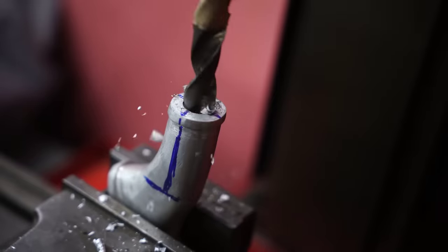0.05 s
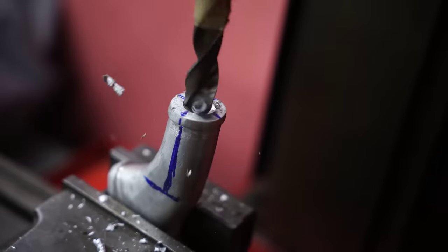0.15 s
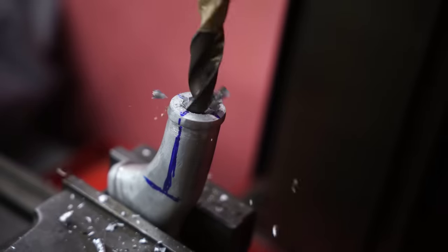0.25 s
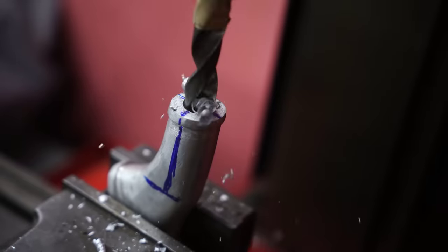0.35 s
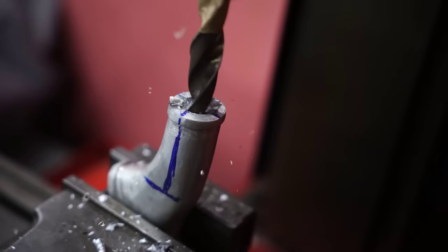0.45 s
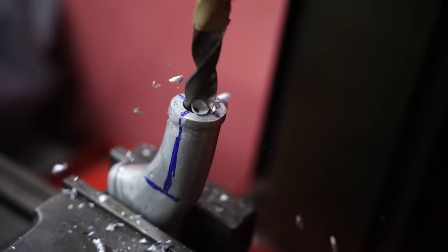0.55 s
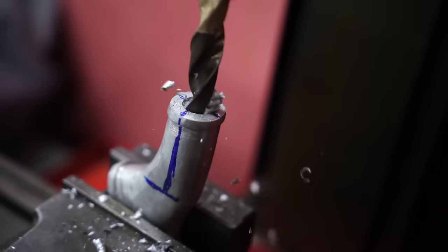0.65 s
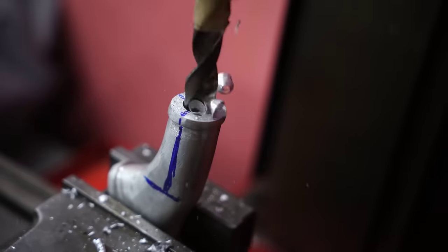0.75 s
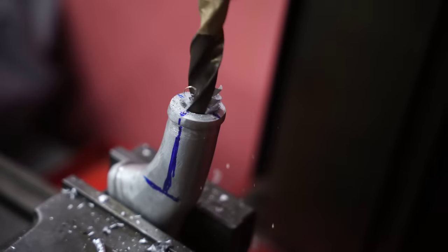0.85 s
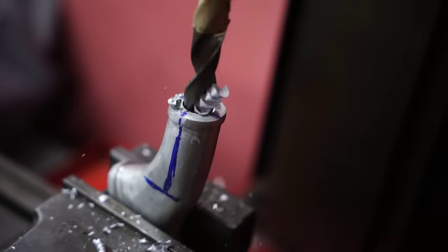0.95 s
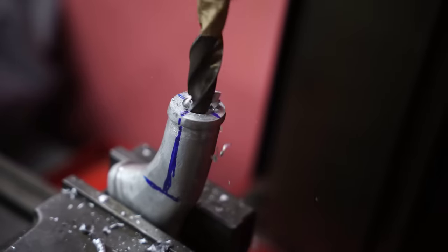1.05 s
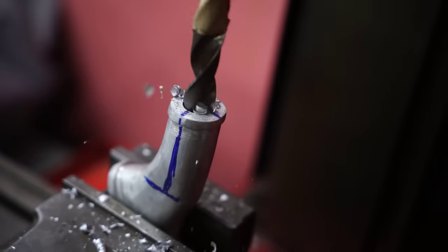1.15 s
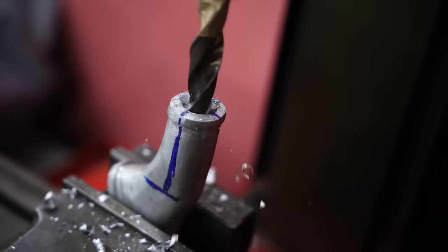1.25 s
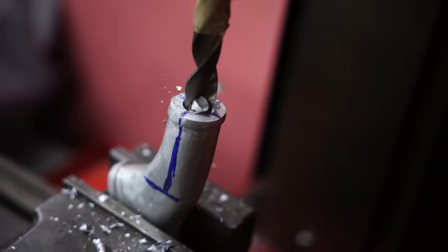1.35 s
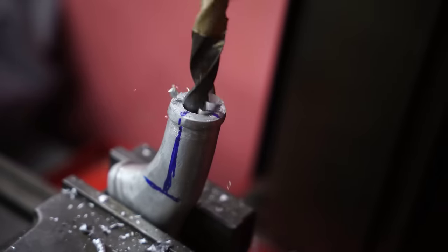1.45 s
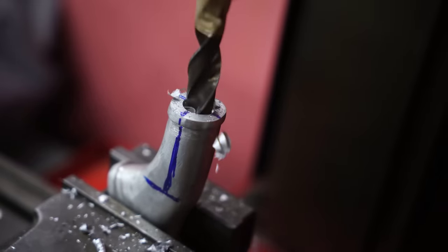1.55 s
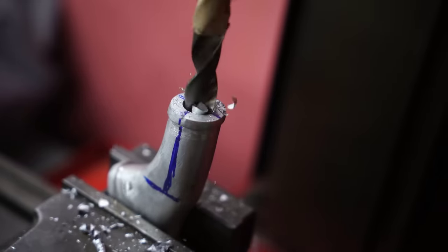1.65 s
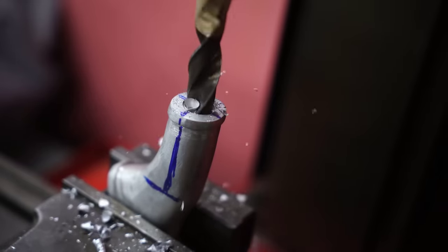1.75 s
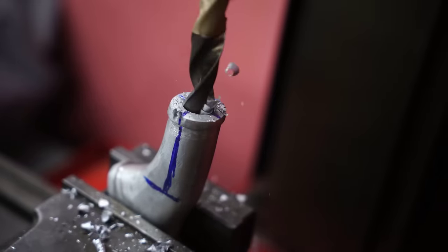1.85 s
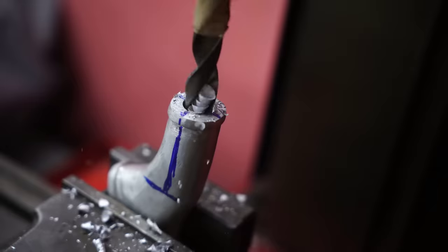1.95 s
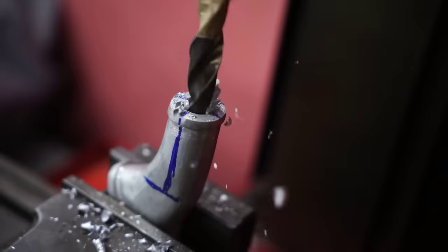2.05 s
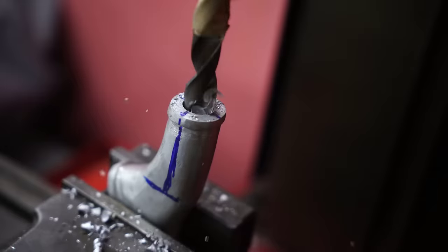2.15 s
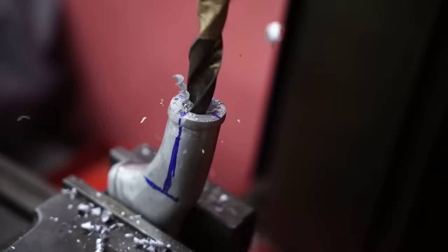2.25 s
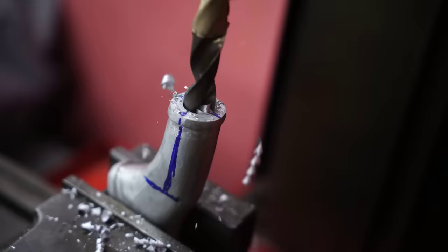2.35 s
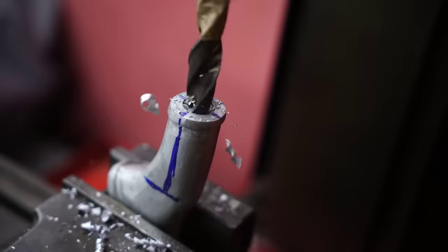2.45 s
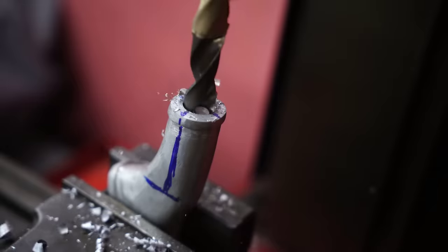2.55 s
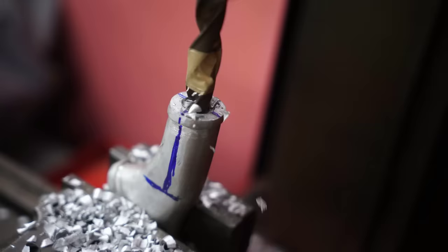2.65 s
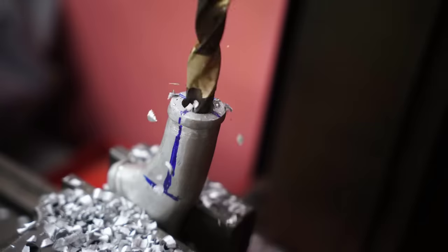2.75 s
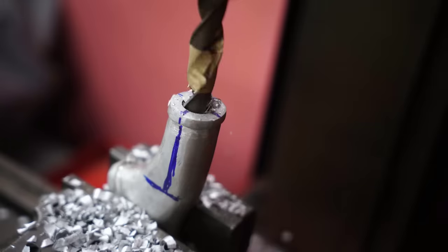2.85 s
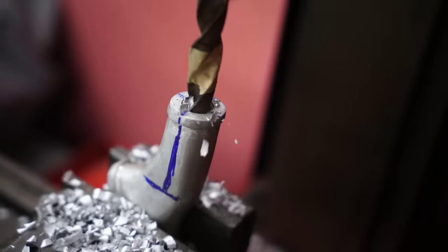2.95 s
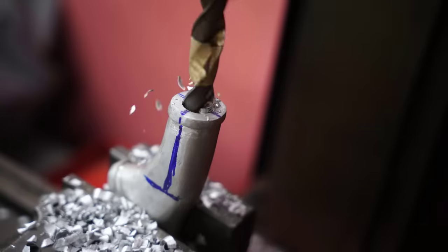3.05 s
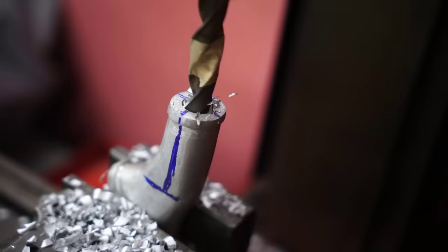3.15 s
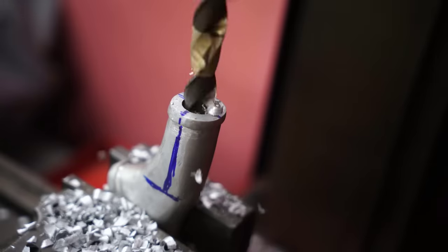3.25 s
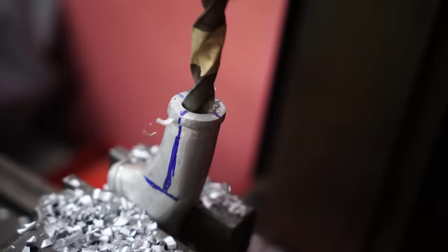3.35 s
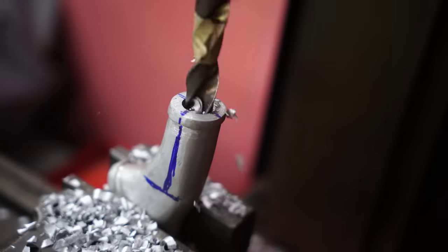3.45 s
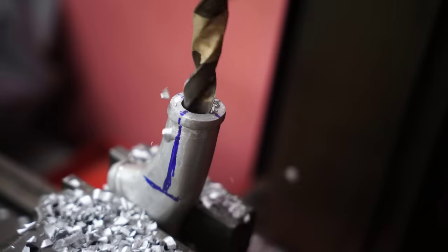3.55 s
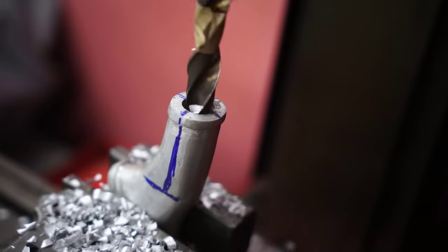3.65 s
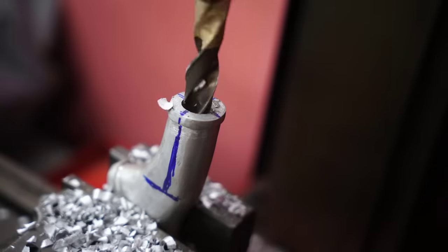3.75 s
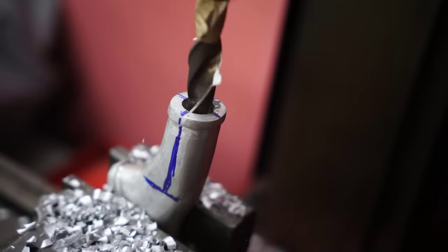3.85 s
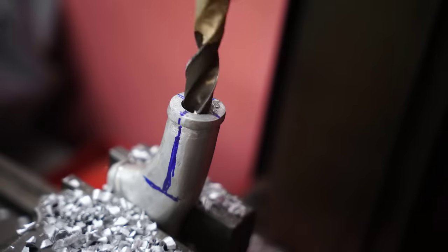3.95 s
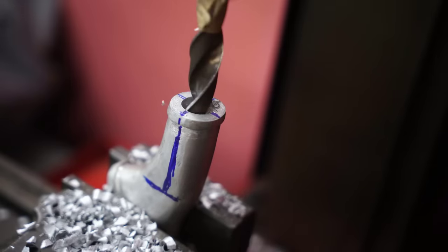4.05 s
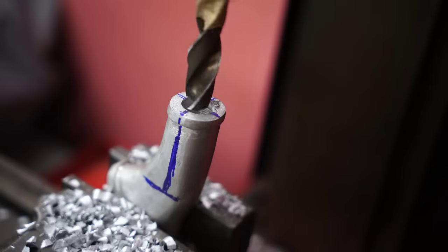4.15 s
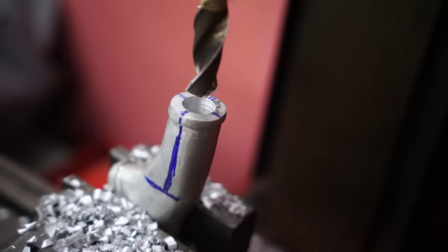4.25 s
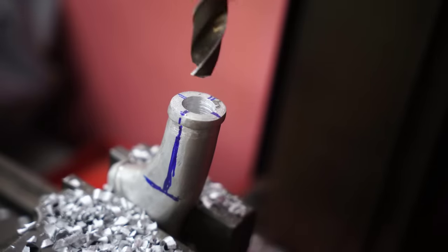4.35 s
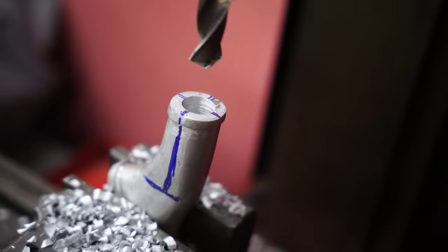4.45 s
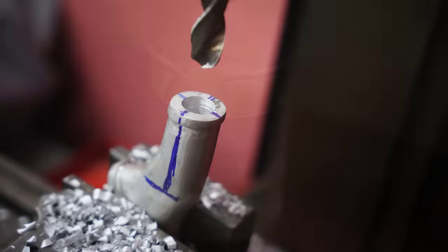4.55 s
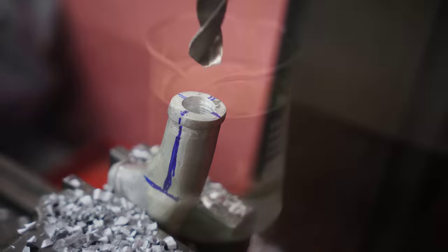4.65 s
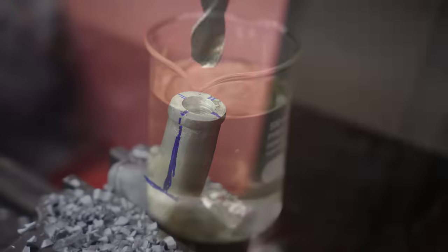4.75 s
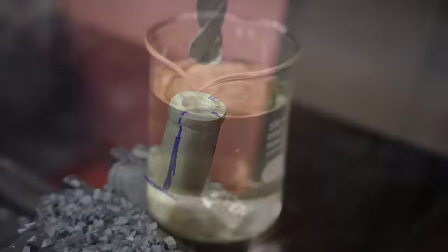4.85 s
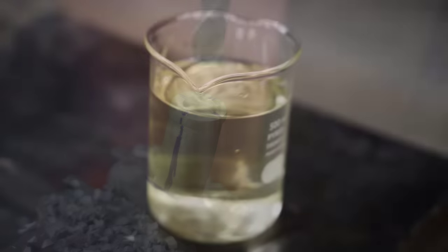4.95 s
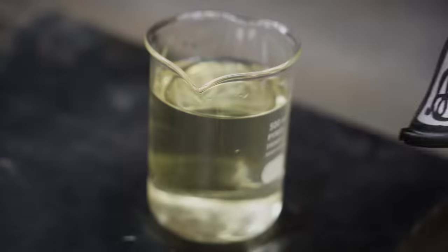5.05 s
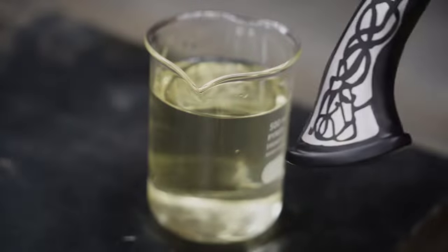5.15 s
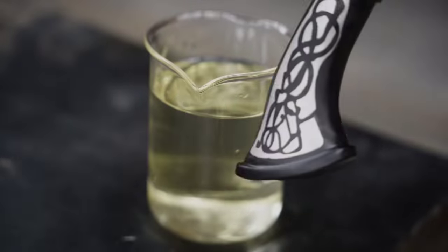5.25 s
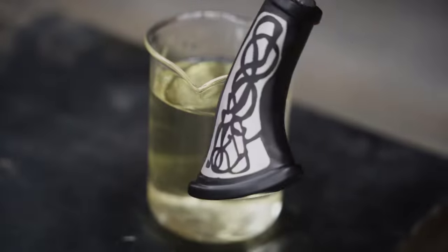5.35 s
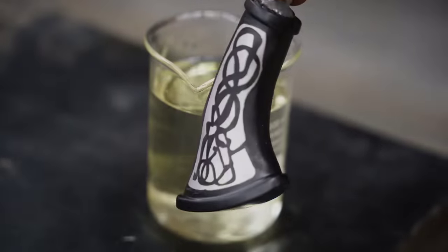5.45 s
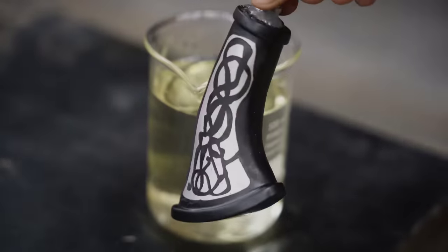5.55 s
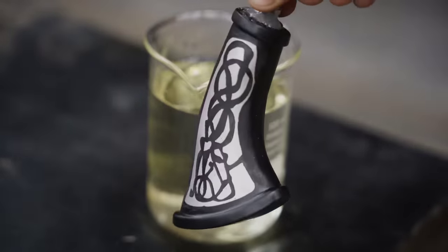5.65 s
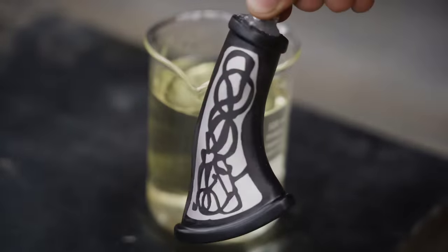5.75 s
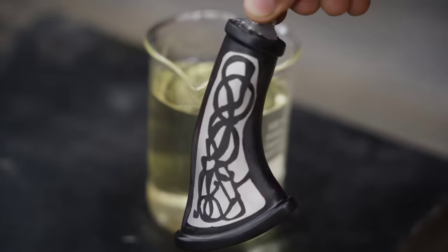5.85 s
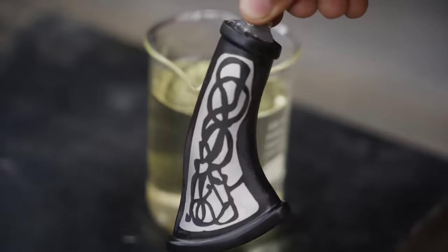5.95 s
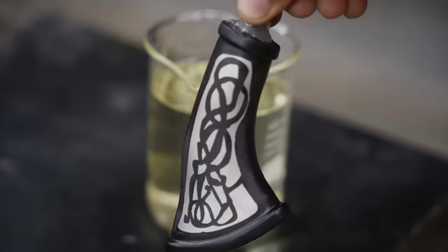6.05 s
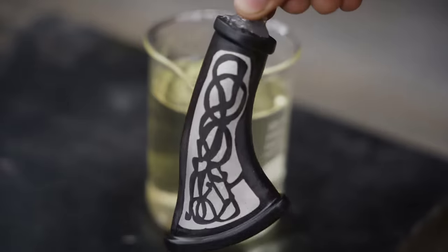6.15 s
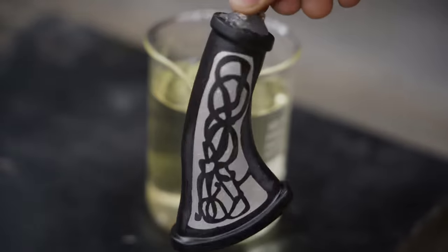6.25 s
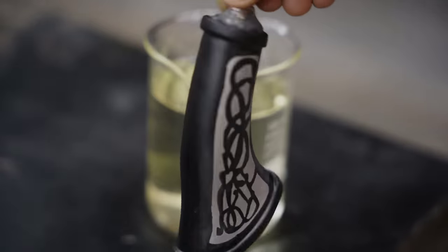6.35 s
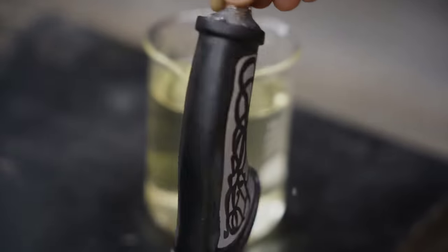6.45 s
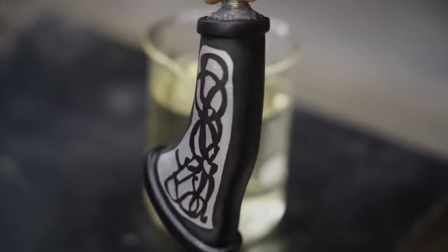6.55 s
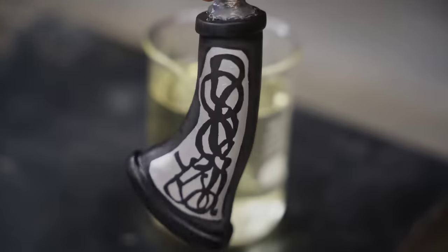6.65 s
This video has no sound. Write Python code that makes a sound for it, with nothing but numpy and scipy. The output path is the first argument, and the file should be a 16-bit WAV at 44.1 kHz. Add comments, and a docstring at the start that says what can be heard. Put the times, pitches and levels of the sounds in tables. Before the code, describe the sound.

Close up, a twist drill bores into a clamped metal casting with loud, rough, bright tearing and snapping chips. At about 2.7 seconds it becomes quieter, uneven rubbing with short squeals, groans and ticks, ending in a few knocks as the drill lifts clear. The drilling stops and a soft workshop fan hum fades in; a metal part clinks onto a bench, cuts off, and the hum swells again.

```python
"""A twist drill bores into a metal casting held in a vice: rough tearing noise rings drill and casting and
throbs with each turn, and thick chips snap. Then the drill binds and squeals, chips tick, and the drill knocks
the hole and lifts clear. From 4.575 s a quiet workshop is heard instead: a fan, made of air noise through
resonances plus steady tones, fades in, and a metal part is set on the bench, its ringing modes made of close
pairs of tones that beat. At 5.742 s the part is silent and the hum drops abruptly, then swells again."""
import sys
import numpy as np
from scipy import signal
from scipy.io import wavfile

SR = 44100
rng = np.random.default_rng(int(sys.argv[2]) if len(sys.argv) > 2 else 0)


def store_wav(level_fs):
    """Save 16-bit WAV to argv[1]."""
    pcm = np.round(np.clip(np.atleast_2d(level_fs), -1, 1) * 32767)
    wavfile.write(sys.argv[1], SR, pcm.T.astype(np.int16))


N = 295773

# Two stretches of fan hum; its swings move the regions and tones of the fan: time_s, level_db
HUM = [
    [(4.575, -69.5), (4.78, -57), (4.84, -44), (4.89, -44.5), (4.925, -42.5), (4.945, -53), (4.98, -40),
     (5.04, -41.5), (5.1, -44.5), (5.39, -40), (5.689, -41), (5.742, -46)],
    [(5.742, -69), (5.84, -52.5), (5.92, -40), (6.068, -38.5), (6.2, -37), (6.25, -34), (6.31, -43.5),
     (6.4, -36.5), (6.51, -41.5), (6.65, -35.5), (6.707, -42)],
]
# Borders between rumble, hum, rush, whir and hiss of the fan: pitch_hz
HUM_EDGES_HZ = [25, 210, 720, 1400, 3100, 13500]
# Resonances of fan and duct, balanced within each region: pitch_hz, width_hz, level_db
FAN = [(70, 115, -19), (132, 21, -16.5), (280, 30, -12.5), (346, 70, -9), (381.3, 4.6, -4.5),
       (461, 35, -10.5), (642.5, 9.4, -12.5), (567, 39, -19.5), (860, 230, -29), (1170, 450, -27.5),
       (1565, 5.4, -18), (1780, 180, -27.5), (2480, 450, -28.5), (3580, 320, -41), (4380, 1500, -41.5),
       (6650, 540, -37.5), (8900, 1300, -51.5), (12400, 1900, -43.5)]
# Rumble, hum, rush, whir and hiss of the fan: mean_level_db, share_of_hum_swing
FAN_REGIONS = [(-54, 0.31), (-45, 0.9), (-59.5, 0.21), (-55, 0.13), (-62, 0.085)]
# Steady tones of the fan motor, at the mean hum level: pitch_hz, level_db
FAN_TONES = [(378, -45), (647.5, -56.5), (1497, -68)]
# The fan's reedy whir coming and going: time_s, level_db
WHIR = [(4.6, -65), (4.85, -73), (5.1, -58.5), (5.25, -54), (5.39, -59), (5.46, -78), (5.63, -54),
        (5.7, -64), (5.8, -83), (5.92, -50.5), (6.07, -70), (6.24, -51.5), (6.31, -56), (6.42, -51.5),
        (6.53, -46.5), (6.65, -60), (6.707, -56)]
WHIR_HZ, WHIR_WIDTH_HZ, WHIR_LEFT_DB = 1803, 120, 11
# Thin electrical whine: time_s, level_db
WHINE = [(2.7, -46), (2.79, -39), (3.43, -68), (3.5, -57), (4.41, -56), (5.05, -75.5), (5.08, -98)]
WHINE_HZ, WHINE_DROP_DB = 15654, 10.5
# Stereo width of the fan, the soft singing noises and the part's treble crack: pitch_hz, side_minus_mid_db
SIDE_FAN = [(60, -46), (110, -45), (200, -40), (380, -21), (700, 6), (1290, -4.5), (2380, -1), (4400, 0.5),
            (8120, 1.5), (15000, -1)]

# Ringing modes of the metal part: pitch_hz, level_db, ring_t60_s
PART = [(3345, -18, 0.95), (3635, -3.5, 0.16), (4315, -23.5, 0.88), (6000, -31, 0.24), (6170, -21, 0.32),
        (6700, -39, .25), (7550, -41, 0.12), (8300, -24, 0.15), (9800, -22, 0.1), (10550, -27, .1),
        (11100, -23, 0.1)]
# The part is set down and rocks: start_s, level_db, share_of_ring_time, rise_ms, held_s, treble_db_per_octave
TOUCHES = [(5.43, -23, 0.17, 3.4, .012, 1), (5.449, -32, .2, 2, .004, 0),
           (5.459, -26.5, 0.14, 2, 0.0034, -7), (5.468, -28, 0.3, 5, 0.037, -17),
           (5.524, -41, 0.34, 4, 0.0079, -20), (5.551, -39, 0.48, 3, 0.0068, -20)]
TREBLE_FROM_HZ = 4400   # the treble slope of a touch starts here
PAIR_APART = 0.005   # share of the pitch
PARTNER, PARTNER_T60_S = 0.36, 2.0   # second tone of each pair: strength and own fading
ROOM_DB, ROOM_BASE_S = -21.5, 0.98   # the workshop holds each ring; shorter for higher modes, then to power 1.7
CRACK_DB, CRACK_T60_S = -33, 0.11   # treble crack of the first touch
SNAP_HZ, SNAP_WIDTH_HZ, SNAP_DB, SNAP_T60_S = 3970, 590, -35, 0.07   # duller part of the crack
# Stereo width of the clinks: pitch_hz, side_minus_mid_db
SIDE_CLINK = [(60, -16), (240, -22), (950, -4), (3770, -0.5), (15000, -3)]
# Short soft singing noises of the sliding part, and a low fan whir at 1690 Hz:
# start_s, level_db, pitch_hz, length_s
SLIDE = [(4.674, -52, 3610, 0.083), (4.772, -59.5, 6080, 0.042), (4.83, -62, 3550, 0.12),
         (4.6, -59.5, 1690, 0.22), (4.61, -64, 4010, .03), (4.755, -65, 4600, 0.046),
         (5.43, -51, 1103, 0.086), (5.435, -55, 1340, 0.036), (5.436, -48, 6200, 0.028)]
# Resonances of the bench, balanced against each other: pitch_hz, width_hz, level_db
BENCH = [(277, 15.4, -0.5), (366, 7.1, 5.5), (444, 10.5, -6), (148, 48, -28), (580, 59, -40)]
THUMP_S, THUMP_DB, THUMP_T60_S = 5.425, -21, 0.76
PART_END_S, FADE_OUT_S = 5.742, 0.012   # the part is silent from here, after a short fade

# Resonances of drill, casting and vice:
# pitch_hz, width_hz, shallow_cut_db, deep_cut_db, binding_db, lifted_db
BODY = [(131, 106, -34, -34, -17, -5), (181.7, 6.5, -16.5, -27, -10.5, -2), (249, 49, -22.5, -15, -5, -2.5),
        (327.7, 21.3, -2, -7.5, -4.5, 3.5), (411.4, 18.6, 0, 0, -1, 2), (486, 61, -0.5, -1, -6, -11),
        (588, 39, -0.5, -4.5, -12.5, -10.5), (661, 21.3, 1, -1, -8.5, -15.5),
        (727.6, 10.4, 1.5, 1.5, -5, -25), (1096, 195, -16.5, -21, -14.5, -23),
        (1205.6, 25.6, -2.5, -3.5, -15.5, -15), (1338, 49, -8.5, -7.5, -22, -16),
        (1555, 84, -38, -43, -16, -30), (1800, 120, -21, -23.5, -11.5, -10.5),
        (2000, 75, -7, -17.5, -12, -37), (2182, 100, -5.5, -11, -16.5, -15),
        (2505, 250, -27, -18, -14.5, -9.5), (2842, 140, -10.5, -14.5, -5.5, -4.5),
        (3063, 85, -1.5, -15, -3, -12), (3150, 26, -4, -2, -7, -2), (3362, 80, -4.5, -3, -4.5, -18.5),
        (3704, 370, -11.5, -8.5, -17, -7), (4550, 253, -8.5, -5, -15.5, -13),
        (5030, 150, -6.5, -8, -18, -11.5), (5525, 193, -3.5, -5.5, -24, -3),
        (6020, 180, -6, -15, -22.5, -16), (6515, 88, 2, 2.5, -12.5, -41), (6814, 200, -5, 0.5, -49, -50),
        (7520, 160, -4, -5, -17, -41), (8160, 170, -7, -4.5, -21, -22), (8930, 660, -1, -11, -53, -27),
        (9610, 59, 2.5, 5, -22, -4.5), (10150, 360, -9, -1.5, -73, -20),
        (11120, 1100, -15.5, -16.5, -47, -25), (13800, 1900, -26, -37, -29, -22),
        (14700, 430, -15.5, -11.5, -76, -40)]
# The drill leaves the wall of the hole between these times: time_s
LIFTED_S = [4.14, 4.22]
# Stereo width of the binding drill: pitch_hz, side_minus_mid_db
SIDE_BIND = [(60, -20), (110, -31), (200, -40), (380, -18), (700, -8), (1290, -4.5), (2380, -8), (4400, -1),
             (8120, -3.5), (15000, 5.5)]
# The casting groans and chirps: start_s, level_db, pitch_hz, length_s
GROAN = [(0.44, -47, 193, 0.28), (1.79, -50.5, 187, 0.08), (2.4, -39, 470, 0.12), (3.02, -38, 5560, 0.022),
         (3.735, -38, 537, 0.053), (3.91, -35.5, 588, 0.045), (4.46, -46.5, 1107, 0.13),
         (2.71, -31.5, 2280, 0.055), (2.79, -39, 253, 0.14), (2.84, -30, 412, 0.023),
         (2.88, -38, 378, 0.058), (2.995, -37.5, 900, 0.016), (2.985, -42, 1208, 0.018),
         (3.1, -41.5, 388, 0.07), (3.32, -39, 420, 0.042), (3.52, -41, 996, 0.026),
         (3.57, -51, 6430, 0.025), (2.876, -32.5, 1030, 0.046), (2.877, -50, 1800, 0.041),
         (3.06, -33.5, 1853, 0.078), (3.175, -41, 700, .02), (3.196, -35.5, 770, 0.02),
         (3.196, -31.5, 1540, 0.012), (4.35, -51, 4000, .08), (4.2, -46, 479, .06),
         (3.303, -37.5, 1034, 0.014), (3.389, -35, 1534, 0.075), (3.441, -39, 563, 0.095),
         (3.446, -45.5, 1027, 0.16), (2.85, -41, 6650, 0.021), (2.74, -42.5, 5400, 0.035),
         (3.45, -48, 6340, 0.05), (3.721, -52.5, 7750, 0.042), (3.787, -47, 7700, 0.019),
         (3.899, -37, 745, 0.024), (3.927, -52, 6500, 0.018), (3.98, -51.5, 7600, 0.016),
         (4.06, -38, 484, 0.096), (4.275, -34, 443, 0.019), (4.5, -40.5, 288, 0.09)]
GROAN_WIDTH = 0.12   # share of the pitch
# Chips tick and the drill knocks the hole; the knocks function adds to crack and stretches the rise:
# start_s, crack_db, brightness_db_per_octave, ring_pitch_hz, ring_db, rise_ms
KNOCK = [(3.025, -29, 2, 1950, -13, 1), (3.385, -22, 10, 6340, -19.5, 1.2), (3.397, -27, 4, 7950, -21, 1.6),
         (3.409, -16.5, 7, 1500, -28, 1), (3.248, -30, 8, 5870, -22, 2.7), (3.381, -34, 3, 4800, -25, 3),
         (3.439, -24, 12, 9550, -14, 2), (3.529, -35, 6, 2000, -24, 1.2), (3.592, -40, 4, 4970, -23, 1.7),
         (4.454, -40, -2, 1138, -24, 2.5), (3.589, -34, 3, 1890, -29, 1.5), (4.226, -42, 8, 5570, -31, 1.1),
         (4.238, -47, -2, 2430, -28.5, 2), (4.243, -47, 5, 6000, -30, 1), (4.303, -36, 1, 2910, -26, 1.4),
         (4.325, -42, 6, 2520, -30, 1.4), (4.446, -25.5, 7, 5800, -29, 1.4),
         (4.447, -40, 5, 2280, -26, 1.5), (4.236, -38, 11, 5470, -17, 3.1),
         (4.25, -35.5, 9.5, 10000, -30, 2), (4.302, -28, 7, 6070, -13, 1.6), (4.304, -44, 10, 9600, -31, 2),
         (4.304, -46, 9, 13000, -38, 1.5), (4.315, -36, 6, 5700, -32, 1), (4.227, -46, 6, 8600, -38, 1.5),
         (3.473, -40, 8, 9600, -31, 1.4), (4.322, -29, 0, 5550, -23, 1.6), (4.33, -40, 8, 9900, -27, 1.3),
         (4.444, -26, 8, 1180, -20.5, 2.6), (4.453, -25, 7, 2275, -23, 2.1),
         (4.461, -18, 4, 9760, -31, 1.3), (4.466, -20, 5.5, 5600, -27, 2.5),
         (4.497, -26, 6, 5440, -33, 0.86), (4.503, -36.5, -6, 3180, -26, 5)]
BOUND_DULL_HZ = 10000   # ticks and knocks down in the hole lose their top
# The drill snatches and squeals; the snatches function adds to the rasp:
# start_s, squeal_db, start_pitch_hz, end_pitch_hz, length_s, rise_ms, rasp_db, rasp_brightness_db_per_octave
SNATCH = [(2.823, -28, 2080, 2100, .012, 6, -36, 4), (2.888, -31, 3080, 3090, 0.0071, 3, -37, 0),
          (2.86, -40, 3270, 3320, 0.024, 6.6, -30, -4.5), (2.867, -29, 2954, 3035, 0.026, 6, -39, -7),
          (2.875, -28, 1850, 1870, 0.062, 8, -42, -5), (2.918, -28.5, 2430, 2460, 0.045, 4.9, -43, -6.5),
          (2.963, -31, 2970, 3070, 0.042, 8, -28, 3), (2.996, -24, 1732, 1890, 0.024, 8, -24.5, 3),
          (3.001, -27, 2600, 2680, 0.013, 4, -40, 3), (3.018, -30, 3440, 3530, 0.03, 5.7, -21, 6.5),
          (3.035, -18.5, 1820, 2040, 0.017, 4.5, -28, 5), (3.076, -28, 2050, 2010, .005, 3, -35, 5),
          (3.134, -25.5, 1880, 1940, 0.015, 4, -33, -1), (3.197, -24.5, 2300, 2280, 0.007, 4.4, -28, 7),
          (3.241, -19, 2967, 2940, 0.017, 2.4, -19.5, 5.5), (3.242, -20.5, 3180, 3125, 0.015, 3, -45, 5),
          (3.265, -24.5, 3050, 3000, 0.034, 3, -38.5, -4.5), (3.293, -22, 3030, 2990, 0.017, 8, -37, -1.5),
          (3.358, -27, 3030, 3000, 0.02, 8, -26, 11.5), (3.38, -25.5, 3010, 2980, 0.012, 4.4, -18, 10),
          (3.393, -27, 3020, 2990, 0.007, 3, -14, 6), (3.413, -25, 3100, 3050, 0.0063, 2, -19, 3),
          (3.435, -24.5, 3170, 3220, 0.013, 4.4, -29, 10), (3.518, -31, 3010, 3050, 0.028, 3.7, -30, 3),
          (3.585, -32.5, 3010, 3100, 0.026, 3, -36, -5), (3.725, -38.5, 3040, 3000, 0.041, 7.4, -56, -8),
          (3.858, -31, 2980, 3040, 0.018, 4, -36, 7), (3.888, -22, 3080, 3005, 0.029, 4, -36.5, -4.5),
          (3.928, -25, 3010, 3020, 0.028, 5, -42, 2), (4.003, -36, 3000, 3000, 0.019, 7.1, -46, 0),
          (4.048, -26, 3020, 3024, 0.02, 14, -34, -5.5)]
SQUEAL_FLUTTER_DB, LET_GO_T60_S = 2.2, 0.06
# Grip of the flutes on the wall of the hole, heard as chatter; only its swings count: time_s, level_db
GRIP = [(2.7, -36.5), (2.79, -36.5), (2.835, -26.5), (2.88, -26), (2.96, -28.5), (3.0, -23), (3.054, -32),
        (3.12, -35.5), (3.22, -32.5), (3.388, -32.5), (3.44, -31), (3.53, -37), (3.6, -38), (3.66, -43.5),
        (3.8, -43.5), (3.936, -49), (4.02, -41), (4.198, -44), (4.406, -36.5), (4.526, -31), (4.575, -38.5)]
# Borders between vice, wall, chatter, squeal, shank, lips and chip hiss while binding: pitch_hz
BIND_EDGES_HZ = [40, 850, 1600, 2700, 3700, 8500, 12300, 15800]
# Levels of those seven regions: binding_db, lifted_db, share_of_grip_swing, bass_drop_loss_db, extra_at_start_db
BIND_REGIONS = [(-39, -46, 0.078, 16.5, -1.5), (-46.5, -51, 0.94, 12, -7), (-39, -50.5, 1, 0.5, 0.5),
                (-38.5, -46, 0.84, -0.5, 0), (-48, -52.5, 0.75, 8, 19.5), (-54, -66, 0.43, 5, 25),
                (-66.5, -68, .2, 4, 34)]
SETTLE_S = 0.093   # how fast the extra at the start dies away
# The bass drops out briefly under the hardest squeals: start_s, length_s
BASS_DROP = [(3.017, 0.053), (3.253, 0.044), (3.389, 0.033)]
DROP_FALL_S, DROP_RISE_S = 0.012, 0.045

# A thick chip snaps off; crack and ring sit below this level: start_s, level_db, ring_pitch_hz
CHIPS = [(0.0564, -21, 6630), (0.367, -14, 6500), (1.1528, -19, 6140), (1.231, -18.5, 6250),
         (1.6795, -27, 10100), (1.7793, -17, 9900), (1.922, -21, 10040), (1.9765, -16.5, 7450),
         (2.0659, -16, 6650), (2.1124, -19, 6550), (2.2867, -19, 6700), (2.3284, -15.5, 9700),
         (2.5556, -18, 6610), (2.6408, -14, 9780)]
CHIP_CRACK_DB, CHIP_RING_DB, CHIP_BUILD_S, CHIP_T60_S = -1, -10, 0.0076, 0.02
# Feed pressure, heard as the rumble of the vice; only its swings count: time_s, level_db
FEED = [(0.0, -30), (0.01, -31), (0.1, -26), (0.31, -28.5), (1.17, -30.5), (1.24, -36), (1.31, -32.5),
        (1.71, -42), (2.03, -32), (2.2, -39), (2.24, -29.5), (2.27, -45), (2.32, -30), (2.34, -37),
        (2.51, -32.5), (2.7, -34.5)]
# Borders between vice, casting, shank, lips and chip hiss in the cut: pitch_hz
CUT_EDGES_HZ = [135, 790, 3300, 8500, 11000, 16000]
# Levels of those five regions: shallow_cut_db, deep_cut_db, share_of_feed_swing
CUT_REGIONS = [(-35, -34.5, 0.94), (-37.5, -41, 0.49), (-28, -30.5, 0.32), (-34, -31, 0.074),
               (-39, -44, 0.067)]
# The flutes fill with chips between these times: time_s
DEEPER_S = [1.29, 1.46]
TURNS_PER_S = 14.6   # on average; the speed wanders a little
DEEP_THROB = 0.97   # the throb grows by this share as the flutes fill
# Stereo width of the cutting drill and its chips: pitch_hz, side_minus_mid_db
SIDE_DRILL = [(60, -21), (110, -24), (200, -47), (380, -68), (700, -31), (1290, -16), (2380, -7),
              (4400, -7), (8120, -5), (15000, -3)]

SAME_PATH = 0.4   # share of the side signal that is the same ring arriving a quarter cycle later
# Stereo lean of the treble: time_s, left_minus_right_db
LEAN = [(0, -1), (2.4, 1), (3.0, 0), (4.1, 2), (4.25, -6), (4.57, -0.5), (4.7, 4.5), (5.3, 7), (5.5, 3.5),
        (5.9, 2), (6.71, 5)]
LEAN_FROM_HZ = 1200   # the bass stays in the middle
CUTOFF_HZ = 15850


def amp(db):
    """Decibels to gain."""
    return 10 ** (np.asarray(db) / 20)


def unit(x):
    """Scale to rms 1."""
    return x / np.sqrt(np.mean(x ** 2) + 1e-20)


def span(rows):
    """Sample slice of a curve table and its columns per sample."""
    s, *columns = np.transpose(rows)
    at = np.arange(round(s[0] * SR), min(round(s[-1] * SR), N))
    return slice(at[0], at[-1] + 1), [np.interp(at / SR, s, c) for c in columns]


def drift(rate, size):
    """Slow chance wandering with spread 1; a higher rate in Hz wanders faster."""
    r = np.exp(-80 * np.pi * rate / SR)   # worked out on every 40th sample
    noise = rng.standard_normal(size // 40 + 502)
    slow = signal.lfilter([1], [1, -2 * r, r * r], noise)[500:]
    return np.interp(np.arange(size) / 40, np.arange(len(slow)), unit(slow))


def resonate(x, hz, width_hz):
    """One resonance with gain 1 at its top."""
    r = np.exp(-np.pi * width_hz / SR)
    feedback = [1, -2 * r * np.cos(2 * np.pi * hz / SR), r * r]
    return signal.lfilter([(1 - r * r) / 2, 0, (r * r - 1) / 2], feedback, x + 1e-18)


def resonate_twice(x, hz, width_hz):
    """The same resonance twice, for steeper sides."""
    return resonate(resonate(x, hz, width_hz), hz, width_hz)


def lowpass(x, order, hz):
    """Take away the sound above a pitch."""
    return signal.sosfilt(signal.butter(order, hz, fs=SR, output="sos"), x)


def spread(mid, side, hz, side_table):
    """Left and right from a mid and a side signal."""
    table_hz, table_db = np.transpose(side_table)
    s = amp(np.interp(np.log(hz), np.log(table_hz), table_db))
    return np.array([mid + s * side, mid - s * side])


def tearing(size, grain_db):
    """Dense tearing force: noise whose samples vary in size."""
    grains = np.minimum(rng.exponential(1, (2, size)), 4)
    return rng.standard_normal((2, size)) * amp(grain_db * grains)


def rubbed(force, modes, edges_hz, levels_db, side_table, flicker_db, flicker_rate, fill_db):
    """A rough force drives each resonance with its own flicker; each region follows its level curve."""
    out = 0
    for low, high, level_db in zip(edges_hz, edges_hz[1:], levels_db):
        region = 0
        for k, (hz, width_hz, db) in enumerate(modes):
            if low <= hz < high:
                turned = np.roll(force, 9973 * k, axis=1)   # each mode gets a different stretch of noise
                lead_in = np.hstack([turned[:, -6000:], turned])   # already ringing at the start
                rung = resonate(lead_in, hz, width_hz)[:, 6000:]
                late = np.roll(rung[0], round(SR / hz / 4))
                rung[1] = SAME_PATH * late + np.sqrt(1 - SAME_PATH ** 2) * rung[1]
                flicker = flicker_db * drift(flicker_rate, force.shape[1])
                region = region + amp(db + flicker) * spread(*rung, hz, side_table)
        band = signal.butter(4, [low, high], "band", fs=SR, output="sos")
        # many small modes between the strong ones
        fill = spread(*signal.sosfilt(band, force), np.sqrt(low * high), side_table)
        region = unit(signal.sosfilt(band, region)) + amp(fill_db) * unit(fill)
        out = out + amp(level_db) * unit(region)
    return out


def sung(rows, side_table, width, dying_s):
    """Noise twice through one resonance, swelling, holding and dying away."""
    out = np.zeros((2, N))
    t = np.arange(20000) / SR
    for s, db, hz, length in rows:
        at = round(s * SR)
        swell = np.minimum(t / (0.093 * length), 1) * amp(-60 * np.maximum(t - length, 0) / dying_s)
        noise = resonate_twice(rng.standard_normal((2, 22000)), hz, width * hz)[:, 2000:]
        out[:, at:at + 20000] += amp(db) * swell * spread(*unit(noise), hz, side_table)
    return out


def squeal(hz, size, waver=0.0039, glide=1):
    """A tone that wavers in pitch and flutters in strength."""
    wander = 1 + waver * drift(39, size) + 0.01 * drift(260, size)
    phase = 2 * np.pi * np.cumsum(hz * glide * wander) / SR
    tone = amp(SQUEAL_FLUTTER_DB * drift(120, size)) * np.sin(phase)
    return spread(tone, np.roll(tone, 3) * drift(30, size), hz, SIDE_BIND)


def ring_body(out, s, db, bright_db, force, narrow, scatter_db):
    """A short force rings every mode of the drill with a strength of its own."""
    at = round(s * SR)
    force = np.pad(force, ((0, 0), (0, 3000)))   # room to ring on
    for (hz, width_hz, _, _, bound_db, free_db), luck in zip(BODY, rng.standard_normal(len(BODY))):
        mode_db = bound_db if s < LIFTED_S[1] else free_db
        gain = amp(db + mode_db + bright_db * np.log2(hz / 3000) + scatter_db * luck)
        rung = spread(*resonate(force, hz, width_hz * narrow), hz, SIDE_BIND)
        out[:, at:at + force.shape[1]] += gain * rung
    return out


def bass_drop(where):
    """0 to 1: how far the bass has dropped out."""
    t = np.arange(where.start, where.stop) / SR
    return sum(np.interp(t - s, [-DROP_FALL_S, 0, length, length + DROP_RISE_S], [0, 1, 1, 0])
               for s, length in BASS_DROP)


def fan():
    """Air noise rings the resonances of fan and duct, and the motor adds steady tones."""
    out = np.zeros((2, N))
    mean_db = np.mean([db for rows in HUM for _, db in rows])
    for rows in HUM:
        where, (hum_db,) = span(rows)
        size = len(hum_db)
        swing_db = hum_db - mean_db
        levels_db = [db + share * swing_db for db, share in FAN_REGIONS]
        air = rng.standard_normal((2, size))
        out[:, where] = rubbed(air, FAN, HUM_EDGES_HZ, levels_db, SIDE_FAN,
                               flicker_db=3.35, flicker_rate=4.3, fill_db=-46)
        t = np.arange(size) / SR
        for hz, db in FAN_TONES:
            level = amp(db + swing_db + 1.5 * drift(5.0, size))
            out[:, where] += level * np.sin(2 * np.pi * hz * t + 0.18 * drift(3.5, size))
    return out


def whir():
    """Air noise twice through one narrow resonance, coming and going, from the left."""
    where, (db,) = span(WHIR)
    out = np.zeros((2, N))
    air = resonate_twice(rng.standard_normal((2, len(db))), WHIR_HZ, WHIR_WIDTH_HZ)
    left, right = amp(db) * unit(air)
    out[:, where] = [left * amp(WHIR_LEFT_DB / 2), (0.37 * left + 0.53 * right) * amp(-WHIR_LEFT_DB / 2)]
    return out


def whine():
    """A thin wavering tone, very high: noise through a narrow resonance, dipping with the bass."""
    where, (db,) = span(WHINE)
    out = np.zeros(N)
    tone = unit(resonate_twice(rng.standard_normal(len(db)), WHINE_HZ, 15.0))
    out[where] = amp(db - WHINE_DROP_DB * bass_drop(where)) * tone
    return out


def slides():
    """Short soft singing noises of the sliding part, and a low fan whir: noise around one pitch each."""
    return sung(SLIDE, SIDE_FAN, width=0.049, dying_s=0.082)


def thump():
    """The bench booms roughly under the weight of the part."""
    out = np.zeros((2, N))
    t = np.arange(round(0.4 * SR)) / SR
    boom = sum(amp(db) * resonate(rng.standard_normal(len(t) + 4000), hz, width_hz)[4000:]
               for hz, width_hz, db in BENCH)
    boom = lowpass(boom, 4, 900)   # the boom carries no treble above 900 Hz
    shape = np.minimum(t / 0.021, 1) * amp(THUMP_DB - 60 * t / THUMP_T60_S)
    out[:, round(THUMP_S * SR):][:, :len(t)] = unit(boom) * shape
    return out


def clinks():
    """The first touch cracks; every touch rings modes that are beating pairs, rougher away from 3640 Hz."""
    out = np.zeros((2, N))
    t = np.arange(round(0.35 * SR)) / SR
    size, first = len(t), round(TOUCHES[0][0] * SR)
    band = signal.butter(6, [5600, 11600], "band", fs=SR, output="sos")
    tick = signal.sosfilt(band, rng.standard_normal((2, size)))
    out[:, first:][:, :size] = amp(CRACK_DB - 60 * t / CRACK_T60_S) * spread(*tick, 8000, SIDE_FAN)
    snap = resonate_twice(rng.standard_normal(size), SNAP_HZ, SNAP_WIDTH_HZ)
    snap = np.minimum(t / 0.003, 1) * snap
    out[:, first:][:, :size] += amp(SNAP_DB - 60 * t / SNAP_T60_S) * snap
    for s, db, share, rise_ms, held, treble_db in TOUCHES:
        sound = 0
        for hz, mode_db, t60 in PART:
            phase = rng.uniform(0, 2 * np.pi, (2, 1))   # one for mid, one for side
            partner = PARTNER * amp(-60 * t / PARTNER_T60_S)
            pair = np.sin(2 * np.pi * hz * t + phase)
            pair = pair + partner * np.sin(2 * np.pi * hz * (1 + PAIR_APART) * t + phase)
            own_fade = amp(-60 * np.maximum(t - held, 0) / t60 / share)
            room_t60 = (ROOM_BASE_S * 3640 / max(hz, 3640)) ** 1.7
            room_fade = amp(ROOM_DB - 60 * t / room_t60 + 5 * drift(30, size))
            rough_db = 1.5 * drift(60, size) + 3.5 * abs(np.log2(hz / 3640)) * drift(160, size)
            slope_db = treble_db * np.log2(max(hz / TREBLE_FROM_HZ, 1))
            level = amp(db + mode_db + rough_db + slope_db)
            sound = sound + level * (own_fade + room_fade) * spread(*pair, hz, SIDE_CLINK)
        out[:, round(s * SR):][:, :size] += sound * np.minimum(1000 * t / rise_ms, 1)
    return out


def groans():
    """Short rough bursts of noise from the casting, low to high, each around one pitch."""
    return sung(GROAN, SIDE_BIND, width=GROAN_WIDTH, dying_s=0.1)


def knocks():
    """Chips tick and the drill knocks the hole: short cracks with a rattle into the modes, each with one ring."""
    out = np.zeros((2, N))
    t = np.arange(4000) / SR
    for s, db, bright_db, hz, ring_db, rise_ms in KNOCK:
        at = round(s * SR)
        rise = np.sin(np.pi / 2 * np.minimum(1000 * t / max(1.6 * rise_ms, 0.1), 1)) ** 2
        rattle = amp(-18 - 60 * t / 0.15)
        crack = rise * (np.exp(-t / 0.0019) + rattle) * tearing(4000, 2.3)
        out = ring_body(out, s, db + 11.5, bright_db, crack, narrow=1.2, scatter_db=2.5)
        ring = rise * amp(ring_db - 60 * t / (0.014 + 59.0 / hz))   # high rings die sooner
        out[:, at:at + 4000] += ring * squeal(hz, 4000, waver=0.026)
    lifted = round(LIFTED_S[0] * SR)
    out[:, :lifted] = lowpass(out[:, :lifted], 8, BOUND_DULL_HZ)
    return lowpass(out, 2, 11000)


def snatches():
    """Stick and slip: a gliding squeal and a rough rasp swell, hold, then let go and die away."""
    out, rasps = np.zeros((2, N)), np.zeros((2, N))
    t = np.arange(7000) / SR
    for s, db, start_hz, end_hz, length, rise_ms, rasp_db, bright_db in SNATCH:
        at = round(s * SR)
        past = np.maximum(t - length, 0)
        hold = np.minimum(1000 * t / max(rise_ms, 0.5), 1) * amp(-60 * past / LET_GO_T60_S)
        swell = np.minimum(t / 0.0089, 1) * amp(1.6 * drift(60, 7000))
        rasp = hold * swell * unit(tearing(7000, 3.1))
        rasps = ring_body(rasps, s, rasp_db + 5.0, bright_db, rasp, narrow=0.6, scatter_db=3.0)
        glide = np.interp(t, [0, length], [1, end_hz / start_hz])
        out[:, at:at + 7000] += amp(db) * hold * squeal(start_hz, 7000, glide=glide)
    return out + lowpass(rasps, 8, 10100)   # rubbing has no sharp edges


def bind():
    """The flutes rub unevenly on the wall of the hole until the drill lifts clear."""
    where, (grip_db,) = span(GRIP)
    size, out = len(grip_db), np.zeros((2, N))
    begin = np.exp(-np.arange(size) / SR / SETTLE_S)
    drop = bass_drop(where)
    swing_db = grip_db - grip_db.mean()
    free = np.interp(np.arange(where.start, where.stop) / SR, LIFTED_S, [0, 1])
    modes = [(hz, width_hz, bound_db + free * (free_db - bound_db))
             for hz, width_hz, _, _, bound_db, free_db in BODY]
    levels_db = [bound_db + free * (free_db - bound_db) + share * swing_db - drop_db * drop + begin_db * begin
                 for bound_db, free_db, share, drop_db, begin_db in BIND_REGIONS]
    rub = rubbed(tearing(size, 1.6), modes, BIND_EDGES_HZ, levels_db, SIDE_BIND,
                 flicker_db=3.4, flicker_rate=16.7, fill_db=-17)
    uneven_db = 0.86 * drift(7.2, size) + 0.82 * drift(86, size)
    out[:, where] = amp(uneven_db) * rub
    return out


def chips():
    """Each snap builds up as a burst of tearing through the treble modes, one ring standing out."""
    out = np.zeros((2, N + 6000))
    t = np.arange(2500) / SR
    shape = np.minimum(t / CHIP_BUILD_S, 1) * amp(-60 * np.maximum(t - CHIP_BUILD_S, 0) / CHIP_T60_S)
    for s, db, hz in CHIPS:
        burst = shape * unit(tearing(2500, 1.8))
        rung = sum(amp(deep_db) * spread(*resonate(burst, mode_hz, width_hz), mode_hz, SIDE_DRILL)
                   for mode_hz, width_hz, _, deep_db, _, _ in BODY if 1000 < mode_hz < 11000)
        ring = shape * squeal(hz, 2500, waver=0.021)
        out[:, round(s * SR):][:, :2500] += amp(db + CHIP_CRACK_DB) * rung + amp(db + CHIP_RING_DB) * ring
    return out[:, :N]


def cut():
    """Two lips cut each turn, one harder, so the load throbs at once and twice the turning rate."""
    where, (feed_db,) = span(FEED)
    size, out = len(feed_db), np.zeros((2, N))
    turn = 2 * np.pi * np.cumsum(TURNS_PER_S * (1 + 0.033 * drift(2.5, size))) / SR
    deep = np.interp(np.arange(size) / SR, DEEPER_S, [0, 1])
    throb_db = 0.36 * np.sin(turn) + 0.35 * np.sin(2 * turn + 0.5) + 0.49 * drift(53, size)
    throb_db = (1 + DEEP_THROB * deep) * throb_db
    swing_db = feed_db - feed_db.mean()
    modes = [(hz, width_hz, shallow_db + deep * (deep_db - shallow_db))
             for hz, width_hz, shallow_db, deep_db, _, _ in BODY]
    levels_db = [shallow_db + deep * (deep_db - shallow_db) + share * swing_db
                 for shallow_db, deep_db, share in CUT_REGIONS]
    torn = rubbed(tearing(size, 2.53), modes, CUT_EDGES_HZ, levels_db, SIDE_DRILL,
                  flicker_db=1.83, flicker_rate=15.8, fill_db=-22.0)
    out[:, where] = amp(throb_db) * torn
    return out


def scene():
    """All sources; the treble leans left or right over time."""
    t = np.arange(N) / SR
    drill = cut() + chips() + bind() + snatches() + groans() + knocks()
    drill[:, round(GRIP[-1][0] * SR):] = 0   # the drill is silent from here
    part = clinks() + slides() + thump()
    part = part * np.interp(t, [PART_END_S - FADE_OUT_S, PART_END_S], [1, 0])
    whole = drill + fan() + part + whine()
    bass = lowpass(whole, 1, LEAN_FROM_HZ)
    lean_db = np.interp(t, *np.transpose(LEAN))
    return bass + (whole - bass) * amp([lean_db / 2, -lean_db / 2]) + whir()


def record(dry):
    """The top is cut steeply."""
    return signal.sosfilt(signal.ellip(12, 0.5, 70, CUTOFF_HZ, fs=SR, output="sos"), dry)


dry = scene()
out = record(dry)
store_wav(out)
```